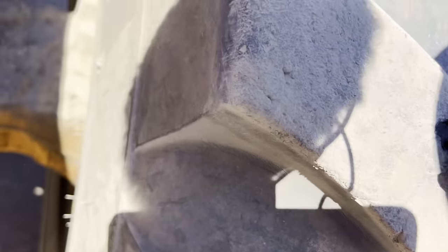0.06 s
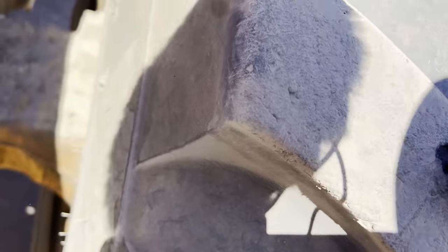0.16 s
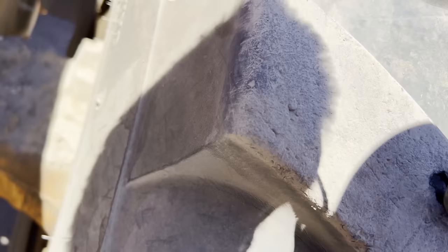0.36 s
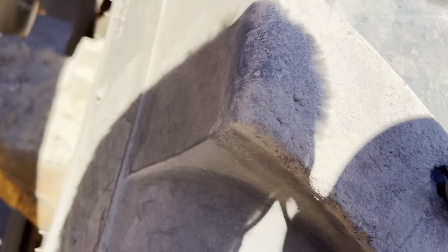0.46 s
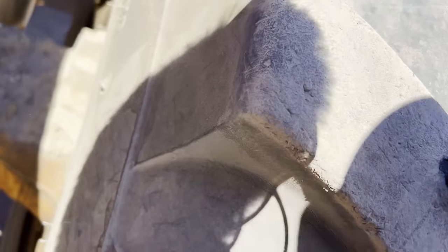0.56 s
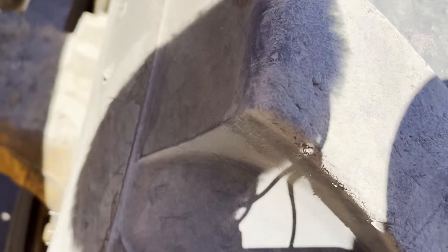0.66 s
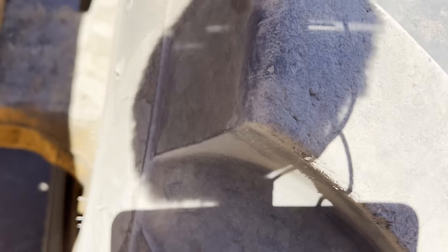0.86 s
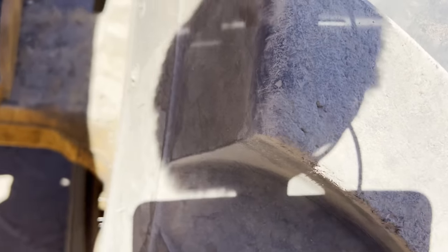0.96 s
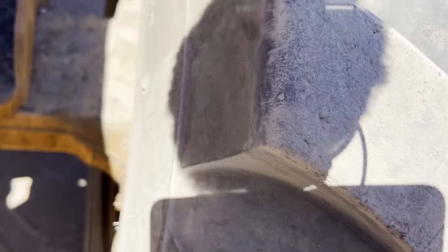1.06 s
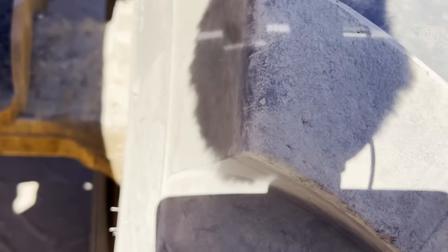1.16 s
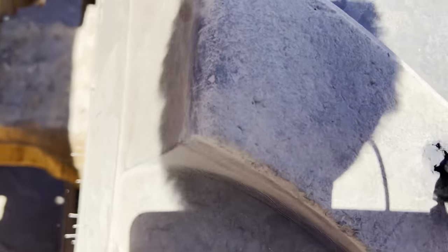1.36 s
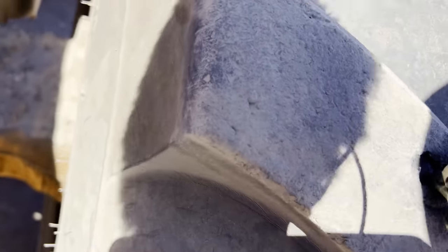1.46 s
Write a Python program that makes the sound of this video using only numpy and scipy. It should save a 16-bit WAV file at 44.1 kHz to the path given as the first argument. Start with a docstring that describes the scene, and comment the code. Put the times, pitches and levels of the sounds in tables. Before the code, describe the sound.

Air hisses from a punctured tire as pliers tick, with one brief louder gush.

```python
"""Air hisses from a punctured tire outdoors: a turbulent jet that whistles in the gap and brightens
as the gap opens. Close to one microphone, pliers work a metal piece loose with knocks, scuffs and ticks.
A hard tug lets out a gush, then the elastic wall thumps back and the leak is half covered.
A low rumble and the hum of a distant idling motor lie underneath."""
import sys
import numpy as np
from scipy import signal
from scipy.fft import rfft, irfft
from scipy.io import wavfile
from scipy.ndimage import uniform_filter1d

SR = 44100
rng = np.random.default_rng(int(sys.argv[2]) if len(sys.argv) > 2 else 0)


def pcm_store(signal):
    """Save signal as 16-bit PCM."""
    levels = np.round(np.clip(np.atleast_2d(signal), -1, 1) * 32767)
    wavfile.write(sys.argv[1], SR, levels.astype(np.int16).T)


N = 66150


def gain_of(db):
    """Amplitude ratio of a level in decibels."""
    return 10 ** (np.asarray(db) / 20)


def unit_rms(x):
    """Normalisation to unit mean power."""
    return x / np.sqrt(np.mean(abs(x) ** 2) + 1e-20)


def power_sum(*levels_db):
    """Incoherent sources add in power; the sum is in dB."""
    return 10 * np.log10(sum(gain_of(2 * db) for db in levels_db))


def spectrum_db(points, hz):
    """Spectral envelope, interpolated over log frequency."""
    point_hz, db = np.transpose(points)
    return np.interp(np.log(hz + 1), np.log(point_hz + 1), db, left=-90)


def unit_spectrum_db(points, hz):
    """Spectral envelope normalised to give noise of about unit power."""
    db = spectrum_db(points, hz)
    return db - 10 * np.log10(np.sum(gain_of(2 * db)) * 2 / 3)


def coloured_noise(gains, length):
    """White noise filtered by a gain per frequency, at unit rms."""
    return unit_rms(irfft(rfft(rng.standard_normal(length)) * gains, length))


def add(mix, start_s, sound):
    """Linear superposition of a sound from its onset."""
    part = mix[round(start_s * SR):][:len(sound)]
    part += sound[:len(part)]


def background():
    """Low noise rumbles; slow amplitude modulation makes a distant motor's partials throb."""
    # rumble spectrum: (frequency [Hz], level [dB])
    rumble = [(12, 0), (20, -7.5), (38, 1), (60, -17.5), (76, -11), (103, -10.5), (214, -15.5),
              (270, -15), (360, -20.5), (606, -26.5), (1040, -36), (2000, -37.5), (2600, -63), (4400, -120)]
    # motor partials: (multiple of the hum frequency, rms level [dB])
    partials = [(.5, -60), (1, -46), (1.5, -57)]
    rumble_db, hum_hz, waver_db, waver_hz = -51.5, 49, 2.5, 2.1
    hz, t = np.fft.rfftfreq(N, 1 / SR), np.arange(N) / SR
    out = gain_of(rumble_db) * coloured_noise(gain_of(spectrum_db(rumble, hz)), N)
    for multiple, db in partials:
        waver = coloured_noise(np.exp(-(hz / waver_hz) ** 2), N)
        phase = 2 * np.pi * (multiple * hum_hz * t + rng.random())
        out += np.sqrt(2) * gain_of(db + waver_db * waver) * np.sin(phase)
    return out


def tire_wall():
    """Elastic flexure: the wall swings for a cycle or two, and its overtone decays first."""
    # wall flexes: (centre time [s], level [dB], frequency [Hz], duration [s])
    thumps = [(.868, -38.5, 160, 0.015), (1.059, -35.5, 70.5, .016), (1.0793, -16, 55.6, 0.026),
              (1.119, -32.5, 56, 0.0386)]
    overtone_ratio, overtone_db, fade_db = 2.5, -20.5, -29.5
    out, t = np.zeros(N), np.arange(N) / SR
    for centre, db, hz, duration in thumps:
        phase = 2 * np.pi * hz * (t - centre)
        position = np.clip((t - centre) / duration, -.5, .5)
        overtone = gain_of(overtone_db + fade_db * position) * np.cos(overtone_ratio * phase)
        out -= gain_of(db) * (np.cos(phase) - overtone) * np.cos(np.pi * position)
    return out


def pliers():
    """Impacts excite damped vibrations, dull on rubber and bright on metal; friction makes noise."""
    # impacts on rubber: (time [s], peak level [dB], frequency [Hz], 60 dB decay time [s])
    knocks = [(0.223, -41.5, 412, 0.01), (0.8682, -22, 595, 0.0085), (1.485, -45.5, 596, 0.01)]
    # friction on rubber: (time [s], duration [s], rms level at the crest [dB])
    scuffs = [(.217, .012, -56), (.867, .007, -43), (1.058, .016, -43), (1.09, .012, -49),
              (1.48, .016, -55)]
    # friction spectrum: (frequency [Hz], level [dB])
    rasp = [(200, -8), (500, -2), (900, -4), (1550, 0), (2100, -6), (3000, -9), (4500, -25)]
    # metal on metal: (time [s], level [dB], frequency [Hz])
    ticks = [(0.571, -24, 4230), (0.7674, -22.5, 4860), (0.8676, -24.5, 5350), (1.1145, -31.5, 4180)]
    lead_cycles = 0.19  # starting in mid-swing gives a knock its sharp front
    tick_t60_s, tick_rise_s = .015, 0.0011
    out, t = np.zeros(N), np.arange(2048) / SR
    for start, db, hz, t60 in knocks:
        add(out, start, -gain_of(db - 60 * t / t60) * np.sin(2 * np.pi * (hz * t + lead_cycles)))
    rasp_gains = gain_of(spectrum_db(rasp, np.fft.rfftfreq(len(t), 1 / SR)))
    for start, duration, db in scuffs:
        envelope = gain_of(db) * np.sin(np.pi * np.minimum(t / duration, 1))
        add(out, start, envelope * coloured_noise(rasp_gains, len(t)))
    for start, db, hz in ticks:
        envelope = gain_of(db - 60 * t / tick_t60_s) * np.minimum(t / tick_rise_s, 1)
        add(out, start, envelope * np.sin(2 * np.pi * hz * t))
    return out


def gliding_bands_db(hz, t):
    """Time-varying filtering: dips and peaks glide through the hiss as hand and pliers move."""
    # bands: (time [s], duration [s], first centre [Hz], last centre [Hz], width [Hz], gain [dB])
    bands = [(0, 0.21, 7800, 8300, 500, -5.5), (0, 0.14, 10000, 9500, 500, -5.5),
             (0.48, 0.53, 5300, 4800, 300, 1.5), (0.53, 0.22, 12300, 9700, 900, -5),
             (.68, 0.34, 4390, 4350, 210, -10.5), (0.52, 0.22, 4530, 4400, 190, -4),
             (.22, 0.44, 3830, 3780, 170, -4.5), (.7, 0.164, 4680, 4800, 160, 4),
             (.55, 0.19, 4270, 4050, 140, 2.5), (0.744, .12, 13000, 13700, 600, -3),
             (0.83, 0.25, 13000, 15000, 250, -4), (0.76, 0.58, 7600, 5000, 180, -4),
             (1.034, 0.027, 8500, 10000, 550, -17), (1.032, 0.071, 13800, 10000, 600, -9),
             (1.095, .14, 11100, 12300, 470, -7), (1.6, .14, 12000, 15000, 500, -8),
             (1.1, 0.063, 9800, 9800, 900, 5.5), (1.1, .08, 14600, 13500, 800, 9),
             (0.99, 0.21, 3990, 4100, 150, 4), (0, 0.2, 5300, 5450, 290, 4.5),
             (.52, .1, 5200, 5200, 300, 4), (1.2, .28, 5400, 5200, 150, -6),
             (1.12, 0.14, 6100, 6300, 500, -1), (1.32, 0.4, 3640, 3900, 200, -3.5)]
    out = 0
    for start, duration, from_hz, to_hz, width_hz, db in bands:
        progress = np.clip((t - start) / duration, 0, 1)
        centre_hz = from_hz + (to_hz - from_hz) * progress
        swell = np.sqrt(abs(np.sin(np.pi * progress)))
        out = out + db * swell * np.exp(-((hz - centre_hz) / width_hz) ** 2)
    return out


def turbulence(field_db, size=1024):
    """Turbulent noise: short-time spectra fluctuate at random about field_db(hz, t)."""
    patch_db, streak_db, flicker_db = 1.6, 2.4, .6  # standard deviations
    hop = size // 4
    hz, t = np.fft.rfftfreq(size, 1 / SR)[:, None], np.arange(N // hop + 5) * hop / SR
    real, imag, patches, streaks = rng.standard_normal((len(t), len(hz), 4)).T
    patches = unit_rms(uniform_filter1d(uniform_filter1d(patches, size=16, axis=0), size=14, axis=1))
    streaks = unit_rms(uniform_filter1d(uniform_filter1d(streaks, size=3, axis=0), size=12, axis=1))
    db = field_db(hz, t) + gliding_bands_db(hz, t) + patch_db * patches + streak_db * streaks
    _, noise = signal.istft((real + 1j * imag) * gain_of(db), nperseg=size, noverlap=size - hop)
    flicker = unit_rms(uniform_filter1d(rng.standard_normal(N), size=300))
    return noise[:N] * gain_of(flicker_db * flicker)


def wash(hz):
    """Broadband noise spectrum in dB: a low hump beneath the jet."""
    peak_hz = 1180
    hump = [(peak_hz / 4, -12), (peak_hz, 0), (peak_hz * 2.53, -3), (peak_hz * 4.8, -40)]
    return unit_spectrum_db(hump, hz)


def jet(colour, hz, fizz_db, treble_db):
    """Jet noise spectrum in dB, weighted by a fizz band and a treble shelf above it."""
    fizz_hz, treble_hz = 5900, 10500  # lower edges
    treble = 1 / (1 + (treble_hz / (hz + 1)) ** 8)
    fizz = 1 / (1 + (fizz_hz / (hz + 1)) ** 8) - treble
    return unit_spectrum_db(colour, hz) + fizz * fizz_db + treble * treble_db


def gush():
    """Pressure drives a brief turbulent burst past the loosened metal piece."""
    # course of the burst: (time [s], level [dB], fizz gain [dB], treble gain [dB])
    course = [(.81, -49, -6, -1), (.845, -37, 0.5, 0), (0.869, -27.5, -5, -5.5), (0.898, -29, -5.5, 0.5),
              (.94, -29, -4, -.5), (.985, -31.5, -1, -1), (1.02, -35.5, -3, 1), (1.044, -40.5, 4, -1),
              (1.07, -49, -9, -5), (1.09, -54, -7, -5)]
    # jet spectrum: (frequency [Hz], level [dB])
    colour = [(880, -72), (1500, -20), (1700, -39), (1840, -38), (2500, -10.5), (2650, -6), (3390, -9),
              (3930, -2), (4330, 1.5), (4510, -3.5), (4780, 2), (5070, -5), (5540, -1), (6300, -8),
              (6880, -2), (7660, -6.5), (8290, -12.5), (9700, -6.5), (10400, -16.5), (11600, -12),
              (12500, -15), (13700, -21), (14100, -8), (14900, -7), (15700, -14.5)]
    times, level_db, fizz_db, treble_db = np.transpose(course)
    wash_db = -21

    def field_db(hz, t):
        hiss = jet(colour, hz, np.interp(t, times, fizz_db), np.interp(t, times, treble_db))
        return np.interp(t, times, level_db, left=-90, right=-90) + power_sum(hiss, wash(hz) + wash_db)
    return turbulence(field_db)


def leak(course, colour):
    """Jet noise and a low wash, with a resonance peak for the breathy whistle in the gap."""
    times, level_db, *columns = np.transpose(course)
    whistle_width_hz = 560

    def field_db(hz, t):
        whistle_hz, whistle_db, wash_db, fizz_db, treble_db = (np.interp(t, times, c) for c in columns)
        detuning = 2 * (hz - whistle_hz) / whistle_width_hz
        whistle = whistle_db - 20 * np.log10(1 + detuning ** 2)
        spectrum = power_sum(jet(colour, hz, fizz_db, treble_db), whistle, wash(hz) + wash_db)
        return np.interp(t, times, level_db, left=-90, right=-90) + spectrum
    return turbulence(field_db)


def covered_leak():
    """Obstructed flow: the half-covered gap gives a weaker jet after the gush."""
    # course of the leak: (time [s], level [dB], whistle frequency [Hz], whistle level [dB],
    # wash level [dB], fizz gain [dB], treble gain [dB])
    course = [(1.04, -44.5, 4840, -22, -32, 1.5, 1.5), (1.098, -49, 4820, -24, -16, 1.5, 1.5),
              (1.116, -44, 4830, -14, -23, 2.8, 2.2), (1.152, -48, 4830, -19, -26, 1.4, 2),
              (1.188, -48, 4500, -14, -30, 0.65, 1.2), (1.238, -53.5, 4680, -9, -30, 1.5, 1.5),
              (1.29, -52, 4670, -17, -32, 2, 1.5), (1.32, -47, 4700, -15, -30, 1.1, 1.2),
              (1.406, -52, 4810, -22, -25, 1, 1.1), (1.43, -49, 4740, -31, -23, 1.5, 1.5),
              (1.452, -51, 4700, -36, -25, 1.9, 1.5), (1.5, -46.5, 4550, -15, -24, 1.8, 1.5)]
    # jet spectrum: (frequency [Hz], level [dB])
    colour = [(1120, -60), (1900, -40), (1950, -31), (2780, -10), (2980, -11.5), (3290, -1), (3370, -8),
              (3560, 1.5), (3850, -2.5), (4640, -2), (6150, -14.5), (8530, -12), (9160, -13.5), (9920, -11),
              (10700, -20), (12400, -16.5), (13000, -28), (14600, -15), (15700, -29)]
    return leak(course, colour)


def open_leak():
    """Orifice flow: compressed air escapes as a turbulent jet before the gush."""
    # course of the leak: (time [s], level [dB], whistle frequency [Hz], whistle level [dB],
    # wash level [dB], fizz gain [dB], treble gain [dB])
    course = [(0.0, -46, 4340, -20, -12.5, 0.5, -4), (0.01, -41.5, 4380, -16, -26, -2.5, -8),
              (0.1, -42.5, 4700, -12, -36, -0.5, -5), (0.112, -48.5, 4720, -10.5, -21.5, 5.5, -1),
              (0.212, -38.5, 4570, -12.5, -31, -8.5, -5), (0.22, -41.5, 4430, -17, -22, -4, -2),
              (0.248, -40, 4200, -16, -23.5, 0, -1), (0.366, -39.5, 4170, -8.5, -13, 4, 2),
              (0.504, -42, 4270, -13.5, -15, 2.5, 1), (0.552, -38, 4250, -16.5, -27, -2.5, -2),
              (0.722, -40.5, 4160, -20, -21, -1.5, -0.5), (0.76, -40, 4700, -23, -23.5, -2, 0),
              (0.768, -39, 4740, -17, -30, 1.5, -16), (0.786, -45, 4720, -19, -21, 5.5, -6),
              (0.802, -42, 4610, -17, -49, -1, -11), (0.83, -41, 4680, -15, -41, -1, -2)]
    # jet spectrum: (frequency [Hz], level [dB])
    colour = [(1120, -52), (1900, -37), (1970, -21.5), (2250, -24), (2610, -11.5), (3200, -6), (3750, -6),
              (4100, 1), (4400, -3), (4800, -5), (5840, -9.5), (6550, -10), (7210, -12.5), (8840, -8.5),
              (9830, -13), (10500, -14.5), (11700, -13.5), (15200, -17.5), (15700, -13.5)]
    return leak(course, colour)


def scene():
    """Sound pressures superpose at one microphone, which feeds both channels."""
    hiss = open_leak() + gush() + covered_leak()
    return np.tile(hiss + background() + pliers() + tire_wall(), (2, 1))


def record(dry):
    """A linear-phase low-pass filter limits the bandwidth."""
    cutoff_hz = 15760
    lowpass = signal.firwin(511, cutoff_hz, window=("kaiser", 9), fs=SR)
    return signal.oaconvolve(dry, lowpass[None], "same")


dry = scene()
out = record(dry)
pcm_store(out)
```